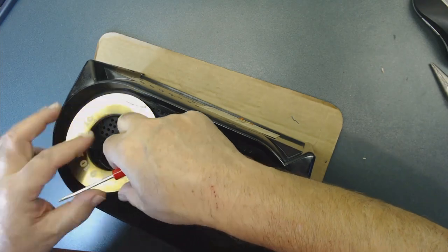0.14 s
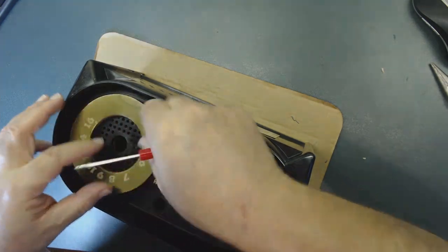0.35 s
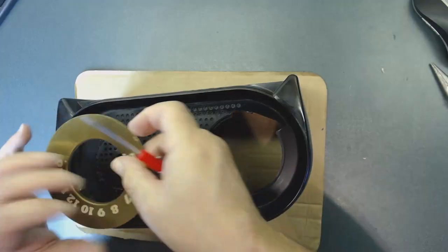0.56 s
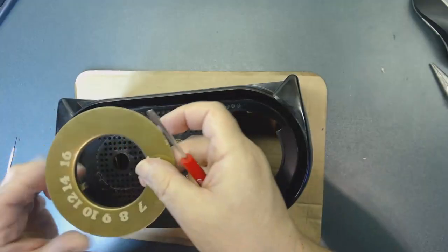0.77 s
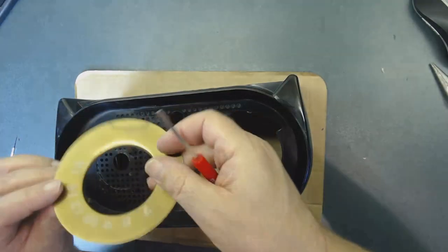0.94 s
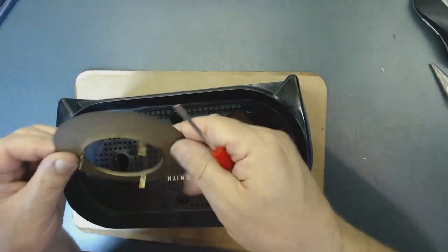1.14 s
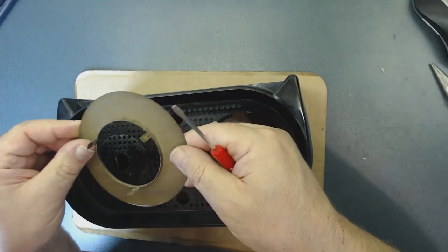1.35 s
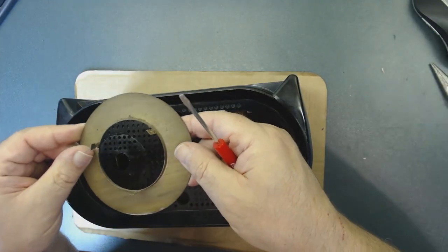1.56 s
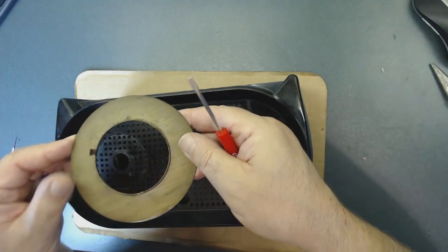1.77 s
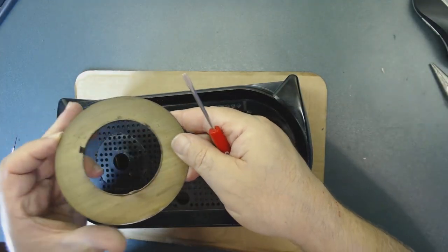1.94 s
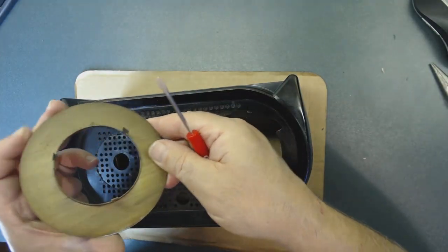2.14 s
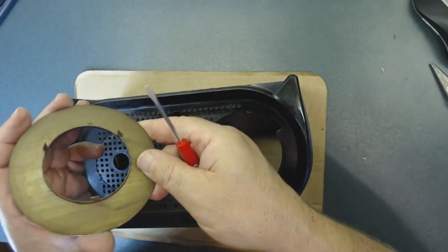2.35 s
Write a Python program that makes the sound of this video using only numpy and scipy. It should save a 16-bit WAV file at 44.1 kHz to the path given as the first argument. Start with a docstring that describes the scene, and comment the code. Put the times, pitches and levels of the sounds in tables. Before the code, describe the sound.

A screwdriver pries a metal ring off a plastic cabinet with a ringing snap.

```python
"""Prying a metal ring off a plastic cabinet

Close microphone at a bench in a small room, over faint hiss, hum and electrical whine.
A small screwdriver scrapes and squeals under a metal ring on a hard plastic cabinet until the
ring snaps free and rings, and the cabinet jumps. Fingers muffle the ring, then turn it over:
light ticks, short rubs and soft bumps of the cabinet on the bench."""
import sys
import numpy as np
from scipy import signal
from scipy.fft import rfft, irfft, next_fast_len
from scipy.io import wavfile
from scipy.ndimage import uniform_filter1d, map_coordinates

SR = 44100
rng = np.random.default_rng(int(sys.argv[2]) if len(sys.argv) > 2 else 0)


def transcribe(signal):
    """Save signal, clipped to [-1, 1], as a 16-bit WAV file at the path in sys.argv[1]."""
    frames = np.atleast_2d(signal).T
    limited = np.clip(frames, -1, 1)
    pcm = np.round(limited * 32767).astype(np.int16)
    wavfile.write(sys.argv[1], SR, pcm)


N = 110250


def amp(db):
    """Decibels to gain."""
    return 10 ** (np.asarray(db) / 20)


def unit(x):
    """Scale to rms 1."""
    return x / np.sqrt(np.mean(x ** 2) + 1e-20)


def along(points, hz):
    """Read (frequency, value) points on a log frequency axis."""
    f, v = np.transpose(points)
    return np.interp(np.log(hz + 1), np.log(f + 1), v)


def clock(n=N):
    """Time of each sample in seconds."""
    return np.arange(n) / SR


def decay(t, t60):
    """A fall of 60 dB every t60 seconds."""
    return np.exp(-np.log(1000) * t / t60)


def wobble(rate):
    """A smooth random curve, rate knots a second."""
    return map_coordinates(rng.standard_normal(1024), [clock() * rate], mode="mirror")


def filtered(x, response):
    """Filter x by a gain given as a function of frequency."""
    m = next_fast_len(N + SR // 4)
    return irfft(rfft(x, m) * response(np.fft.rfftfreq(m, 1 / SR)), m)[..., :N]


def add(track, at, sound):
    """Mix a sound into the track at a time in seconds."""
    part = track[int(at * SR):][:len(sound)]
    part += sound[:len(part)]


def favour(hz, centre_hz, octaves):
    """A contact feeds one region of the spectrum most."""
    return (1 + (np.log2((hz + 1) / centre_hz) / octaves) ** 2 / 2) ** -2.0


def swell(peak, rise, fall):
    """A stroke builds to its peak and eases off."""
    t = clock() - peak
    return np.exp(-np.abs(t / np.where(t < 0, rise, fall)) ** 1.6)  # 1 is pointed, 2 rounded


def mode(hz, rise, t60, wander_rad=.22, flutter_db=1.8):
    """One vibration swells and dies away, slightly unsteady in phase and level."""
    t = clock(SR * 3 // 4)
    knot_times = np.linspace(0, t[-1], 90)
    wander, flutter = (np.interp(t, knot_times, knots) for knots in rng.standard_normal((2, 90)))
    tone = amp(flutter_db * flutter) * np.sin(2 * np.pi * hz * t + wander_rad * wander)
    return tone * (1 - np.exp(-(t / rise) ** 2)) * decay(t, t60)


# Room tone at the bench (frequency [Hz], relative level [dB])
ROOM_TONE = [(25, -5), (55, -8.5), (115, 11.5), (170, -3), (320, -1), (500, -10.5), (700, -3.5),
             (1100, -11), (2300, -14.5), (3300, -20), (5000, -20.5), (7200, -21), (8000, -38.5)]
# Faint electrical tones (frequency [Hz], level [dB])
WHINE_TONES = [(4603, -82.5), (6896, -81.5)]


def background(noise_db=-65.5, waver_rad=.79):
    """Steady hiss with a low hum in it, and a thin, wavering electrical whine."""
    hiss = unit(filtered(rng.standard_normal(N), lambda hz: amp(along(ROOM_TONE, hz))))
    whine = sum(amp(db) * np.sqrt(2) * np.sin(2 * np.pi * hz * clock() + waver_rad * wobble(rate=85))
                for hz, db in WHINE_TONES)
    return amp(noise_db) * hiss + whine


# The small, well furnished room (frequency [Hz], t60 [s])
ROOM_DECAY = [(120, .14), (500, .15), (2000, .17), (7000, .16)]


def reflections(x, t60s=ROOM_DECAY):
    """Diffuse reflections reach the microphone 2 ms after the direct sound and fade band by band."""
    hz, t, bands = signal.stft(rng.standard_normal(SR // 2), SR, nperseg=256)
    tail = signal.istft(bands * decay(t, along(t60s, hz)[:, None]), SR, nperseg=256)[1]
    return signal.fftconvolve(x, np.pad(tail, (SR // 500, 0)) / np.linalg.norm(tail))[:N]


# Modes of the cabinet on the bench (frequency [Hz], relative level [dB], t60 [s])
CABINET_MODES = [(113, -8, .2), (162, -12, .17), (222, -4, .12), (255, -9, .1), (322, -3, .11),
                 (690, -18, .1), (757, -9, .18), (364, 0, .15), (425, -5, .19), (529, -8, .15),
                 (629, -11, .19), (786, 1, .13), (868, -12, .14), (985, -19, .12)]
# Bumps of the held cabinet (time [s], rise [s], level [dB], centre [Hz], spread [octaves])
CABINET_KNOCKS = [(0.111, 0.018, -41, 473.2, 0.18), (.163, 0.021, -53, 332, 1.15),
                  (0.234, 0.018, -43.5, 605, 0.73), (.297, 0.01, -41, 356, 0.34),
                  (.440, 0.0088, -24.5, 352, 0.46), (0.489, 0.012, -45.5, 140, 0.46),
                  (.499, .014, -35, 453, 0.18), (.533, 0.013, -46, 398.5, 0.24),
                  (1.076, .015, -53.5, 129, 0.46), (1.109, 0.0081, -41, 144, 0.31),
                  (1.110, 0.014, -50.5, 353.7, 0.12), (1.178, 0.012, -50.5, 164.2, 0.6),
                  (1.276, 0.0076, -49.5, 110.5, 0.48), (1.287, 0.0088, -46, 691, 0.08),
                  (1.344, 0.012, -55.5, 127, 0.65), (1.379, 0.02, -57, 136, 0.72),
                  (1.434, 0.011, -53, 139.4, 1.18), (1.529, 0.0094, -43, 429.2, 0.39),
                  (1.665, 0.0083, -58, 406, 0.99), (1.899, 0.018, -57, 225, 0.85),
                  (1.95, 0.022, -52.5, 124.8, 0.21), (1.989, 0.015, -53.5, 118.2, 0.26),
                  (2.033, 0.015, -58, 129, 0.78), (2.088, 0.013, -44, 424, 0.16),
                  (2.119, 0.013, -45.5, 124, 0.94), (2.154, 0.011, -49, 122, 0.099),
                  (2.307, 0.014, -44, 438, 0.18), (2.311, 0.01, -52.5, 120, .4),
                  (2.332, 0.012, -46, 522, 0.66), (2.425, 0.0088, -46, 124, 0.22),
                  (2.487, 0.0085, -47.5, 196, 0.89)]


def knocks(sharpness=1.325):
    """Hands and ring push the cabinet and still it again; where they touch decides which modes answer."""
    out, t = np.zeros(N), clock(SR // 4)
    hz, mode_db, _ = np.transpose(CABINET_MODES)
    tones = np.sin(2 * np.pi * hz[:, None] * t)
    for at, rise, db, centre_hz, octaves in CABINET_KNOCKS:
        weights = amp(mode_db) * favour(hz, centre_hz, octaves)
        body = np.sqrt(2) * weights / np.linalg.norm(weights) @ tones
        push = (t / rise) ** sharpness
        add(out, at, amp(db) * push * np.exp(1 - push) * body)
    return out


# Colour of metal rubbing or striking the cabinet (frequency [Hz], relative level [dB])
CONTACT_COLOUR = [(80, -11.5), (250, -3), (420, 4.5), (600, 3.5), (820, 6), (1220, -15), (1500, -0.5),
                  (1750, 0.5), (2200, -3), (2650, -3.5), (3200, -4.5), (3700, -2.5), (4800, -3),
                  (5450, -4.5), (6100, -8), (7200, -9.5), (8000, -36.5)]


def contact(x, centre_hz, octaves, ring_db=4, width_hz=14):
    """Colour x as one contact, at rms 1; it stirs the ring's modes, broadened by the grip."""
    hz = np.fft.rfftfreq(len(x), 1 / SR)
    ring_peaks = sum(1 / (1 + ((hz - mode_hz) / width_hz) ** 2) for mode_hz, _, _ in RING_MODES)
    colour = amp(along(CONTACT_COLOUR, hz)) * (1 + amp(ring_db) * ring_peaks)
    return unit(irfft(rfft(x) * colour * favour(hz, centre_hz, octaves), len(x)))


# Blade or fingers sliding on the ring, close up
# (peak time [s], rise [s], fall [s], level [dB], centre [Hz], spread [octaves])
SCRAPE_STROKES = [(0.112, 0.0079, 0.017, -45.5, 2100, 1.23), (.134, 0.035, 0.023, -45, 1115, 1.65),
                  (0.186, 0.014, 0.023, -54.5, 1940, 0.34), (0.23, 0.0099, 0.016, -38, 2520, 1.57),
                  (0.266, 0.041, 0.027, -44, 3190, 2.04), (.305, 0.025, 0.013, -53, 1897, .4),
                  (1.183, 0.016, 0.029, -50, 4800, 0.96), (1.2, 0.033, 0.034, -55.5, 646, 1.76),
                  (1.298, 0.0072, .017, -51, 2850, 2.0), (1.541, .008, .013, -59, 2203, 1.5),
                  (1.255, 0.022, 0.031, -59.5, 3020, 0.47), (1.655, 0.039, 0.042, -74, 2498, 1),
                  (1.95, 0.031, 0.028, -67.5, 3143, 0.53), (2.048, 0.0094, 0.014, -47.5, 4210, 0.24),
                  (2.046, 0.0074, 0.022, -49, 1945, 0.58), (2.098, 0.037, 0.018, -48.5, 1173, 1.22),
                  (2.155, 0.024, 0.017, -57, 730, 0.7), (2.152, 0.0088, 0.015, -58.5, 1758, 0.21),
                  (2.293, 0.011, 0.033, -53.5, 2340, 0.8), (2.326, 0.023, 0.036, -49.5, 1504, 1.01),
                  (2.498, 0.0096, .02, -51, 888, 2.15)]


def scrapes(slips_per_s=1300, scatter_db=4):
    """Each stroke is a dense run of uneven little slips."""
    out, n = np.zeros(N), SR // 2
    for peak, rise, fall, db, centre_hz, octaves in SCRAPE_STROKES:
        slipping = rng.random(n) < slips_per_s / SR
        slips = slipping * amp(scatter_db * rng.standard_normal(n)) * np.sign(rng.standard_normal(n))
        out += amp(db) * swell(peak, rise, fall) * np.resize(contact(slips, centre_hz, octaves), N)
    return out


# The sliding edge catches on a resonance
# (peak time [s], rise [s], fall [s], level [dB], pitch [Hz], glide [Hz/s], roughness [rad])
EDGE_SQUEALS = [(0.112, 0.007, 0.015, -47, 1700, -2, 0.34), (0.13, 0.015, 0.012, -51, 2400, 3, 1.6),
                (.235, .011, 0.023, -38, 768, -900, .25), (.231, 0.011, .03, -41, 2270, 2, .6),
                (.261, .02, 0.02, -36, 1690, -300, 0.26), (0.3, 0.05, .03, -50, 2060, 0, .9),
                (.235, .009, 0.032, -50, 5390, -1500, 1.2), (1.174, 0.012, 0.02, -54, 1530, 0, .4),
                (1.172, .008, .009, -55, 3650, 0, .4), (1.299, .005, .015, -56, 1400, 0, 1.1),
                (2.047, .008, 0.023, -50.5, 2440, -0.5, 0.44), (2.10, 0.028, 0.019, -54, 980, 0, 0.57),
                (2.325, 0.026, 0.023, -59, 3590, 2, 0.61), (2.33, 0.023, 0.038, -49.5, 790, 4, 0.69),
                (2.345, .03, .025, -57, 860, 0, 0.63)]


def squeals(flutter_db=2.5):
    """The slips lock onto one resonance; it drifts as the edge moves and flutters with its pressure."""
    out = np.zeros(N)
    for peak, rise, fall, db, hz, glide, roughness in EDGE_SQUEALS:
        t = clock() - peak
        phase = 2 * np.pi * (hz * t + glide * t ** 2 / 2) + roughness * wobble(rate=440)
        pressure = amp(flutter_db * wobble(rate=260))
        out += amp(db) * swell(peak, rise, fall) * unit(pressure * np.sin(phase))
    return out


# Sharp metal contacts, close up (time [s], level [dB], centre [Hz], spread [octaves], t60 [s])
METAL_CLICKS = [(0.4304, -21, 5400, .45, .04), (.4306, -25, 1900, .5, .04), (.4345, -22, 2900, .4, .035),
                (.4365, -20, 900, 1.5, .05), (0.439, -16, 2700, 0.3, .04), (.4405, -30, 5600, .5, .025),
                (0.444, -23.5, 502, 0.69, .05), (.497, -44, 1000, .8, .05), (1.111, -60, 3200, .8, .1),
                (1.1915, -38, 4700, .9, .045), (1.199, -43.5, 3500, 2, .06), (1.289, -52, 3200, 1.2, .07),
                (2.289, -53, 2800, .8, .05), (2.318, -49, 2700, .8, .04)]


def clicks():
    """Metal hits hard plastic: an instant crack that dies quickly."""
    out, t = np.zeros(N), clock(SR // 5)
    for at, db, centre_hz, octaves, t60 in METAL_CLICKS:
        crack = contact(rng.standard_normal(len(t)), centre_hz, octaves)
        add(out, at, amp(db) * crack * decay(t, t60))
    return out


def cabinet_recoil(at=.4325, gain_db=-15, rise_cycles=7.2, max_rise_s=.013):
    """The cabinet jumps as the ring lets go; its low modes are the slowest to swell."""
    out = np.zeros(N)
    for hz, db, t60 in CABINET_MODES:
        add(out, at, amp(gain_db + db) * mode(hz, min(rise_cycles / hz, max_rise_s), t60))
    return out


# Modes of the freed metal ring (frequency [Hz], relative level [dB], t60 [s])
RING_MODES = [(1102, -43, 1.0), (1205, -55, .9), (2049, -33.5, .5), (2645, -37, .28), (2885, -36, .3),
              (4554, -40, .27), (5103, -52, .42), (1168, -34, .15), (1346, -36, .24), (1710, -34, .2),
              (1823, -26, .17), (2167, -34, .16), (2385, -34, .18), (2538, -29, .16), (2730, -29, .13),
              (2951, -22, .16), (3155, -36, .18), (3483, -42, .24), (5240, -31, .08), (5382, -26, .13),
              (6260, -41, .12), (6864, -48, .25)]


def ring_snap(at=.4308, gain_db=-1, rise_cycles=14, shimmer_db=-36, grip_s=.766, grip_db=-4.5):
    """The ring springs free and rings, its many weak modes a shimmer, until fingers muffle it."""
    out = np.zeros(N)
    for hz, db, t60 in RING_MODES:
        add(out, at, amp(gain_db + db) * mode(hz, rise_cycles / hz, t60))
    shimmer = contact(rng.standard_normal(SR), centre_hz=2230, octaves=.7)
    add(out, at, amp(shimmer_db) * shimmer * decay(clock(SR), t60=.36))
    grip = np.clip((clock() - grip_s) / .07, 0, 1)  # the fingers close over 70 ms
    return out * amp(grip_db * grip)


# Stereo lean at the microphone (frequency [Hz], left minus right [dB])
STEREO_LEAN = [(60, 6), (130, -9.5), (210, -2.5), (310, 5), (450, 5), (750, 4.5), (1100, 2), (1700, 2),
               (2400, -0.5), (3000, -3.5), (3800, -5.5), (4600, 1.5), (5400, 1.5), (7500, 1.5)]


def scene(bench_db=-20.5, bench_t60_s=.037, room_db=-12.5, side_db=-32.5):
    """The bench from close by, the small room behind it, leaning left or right by frequency."""
    grit = clicks() + scrapes()
    bench = amp(bench_db) * reflections(grit, t60s=[(1, bench_t60_s)])
    close = grit + bench + ring_snap() + cabinet_recoil() + knocks() + squeals()
    mid = close + amp(room_db) * reflections(close) + background()
    side = amp(side_db) * (reflections(close) + background())
    lean = lambda hz: amp(np.outer([.5, -.5], along(STEREO_LEAN, hz)))
    return filtered(np.array([mid + side, mid - side]), lean)


# The microphone's noise suppressor (frequency [Hz], threshold [dB])
GATE_THRESHOLDS = [(100, -64), (400, -57), (1100, -64), (2100, -64), (5000, -68), (8000, -70)]


def suppress_noise(x, depth_db=-4.5, hold_s=.023):
    """Bands that sink toward the noise are turned down."""
    hz, t, bands = signal.stft(x, SR, nperseg=512)
    power = np.abs(uniform_filter1d(np.mean(np.abs(bands) ** 2, axis=0), size=3, axis=0))
    keep = np.exp(-t[1] / hold_s)
    held = signal.lfilter([1 - keep], [1, -keep], power, axis=1)
    threshold = amp(along(GATE_THRESHOLDS, hz))[:, None] ** 2
    shut = 1 / (1 + (held / threshold) ** 2)
    return signal.istft(bands * amp(depth_db * shut), SR, nperseg=512)[1][:, :N]


def record(dry, low_cut_hz=70, top_hz=7850):
    """The microphone suppresses faint noise, sheds deep bass and cuts off the top treble."""
    low_cut = signal.butter(2, low_cut_hz, "high", fs=SR, output="sos")
    band_limit = signal.ellip(10, .2, 70, top_hz, fs=SR, output="sos")
    return signal.sosfilt(band_limit, signal.sosfilt(low_cut, suppress_noise(dry)))


dry = scene()
out = record(dry)
transcribe(out)
```